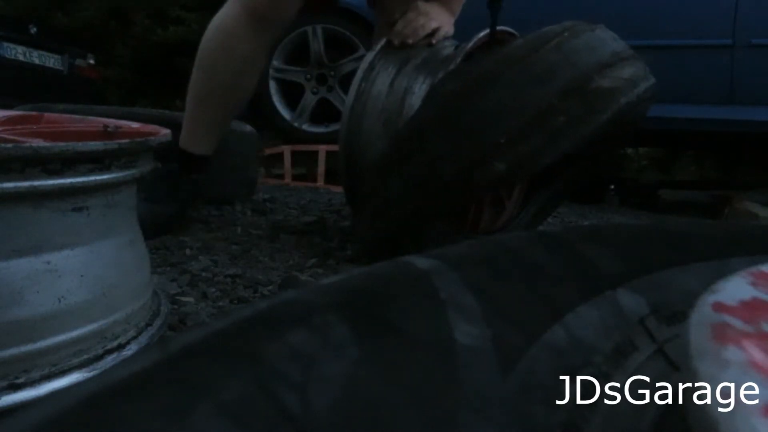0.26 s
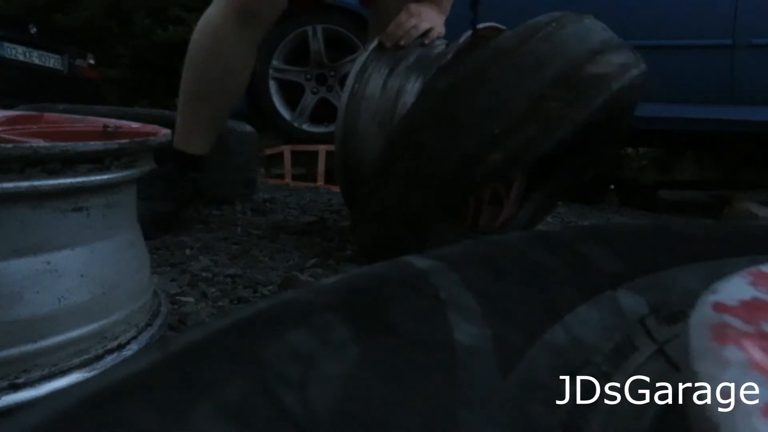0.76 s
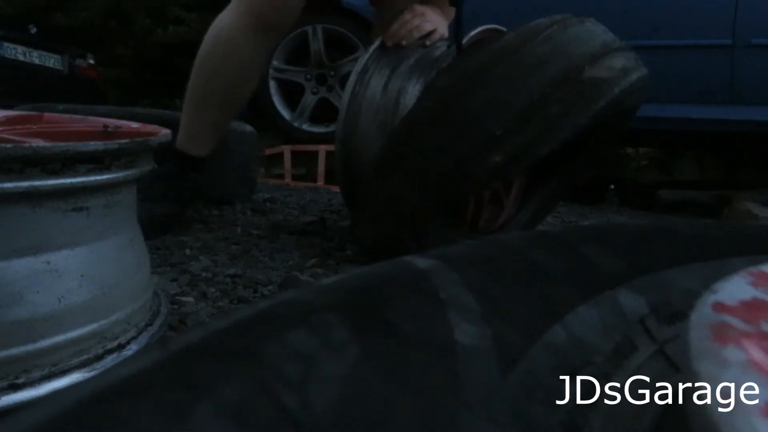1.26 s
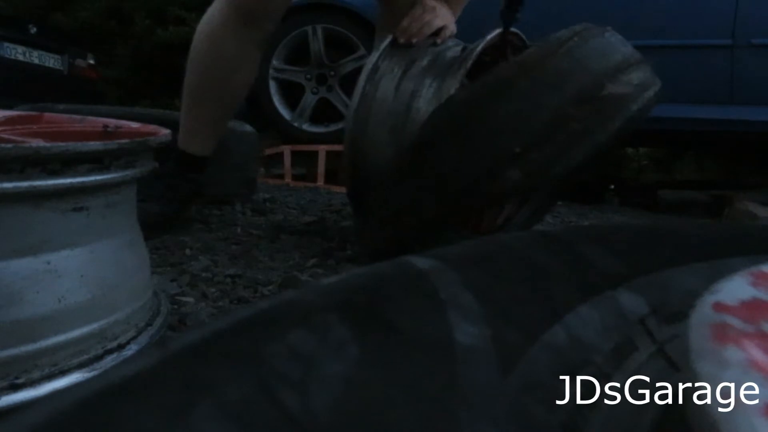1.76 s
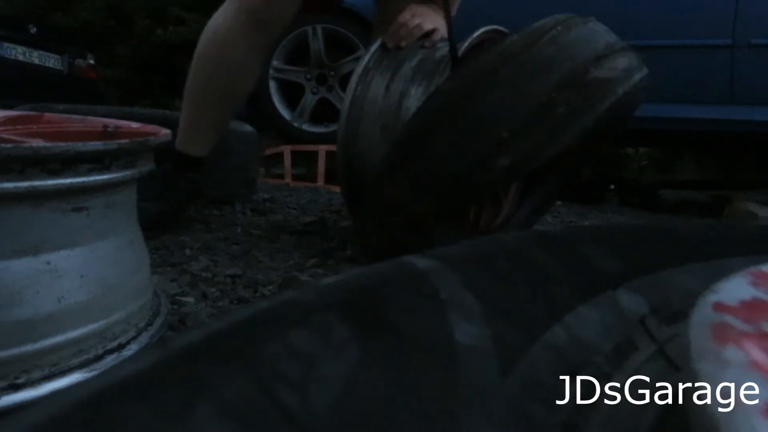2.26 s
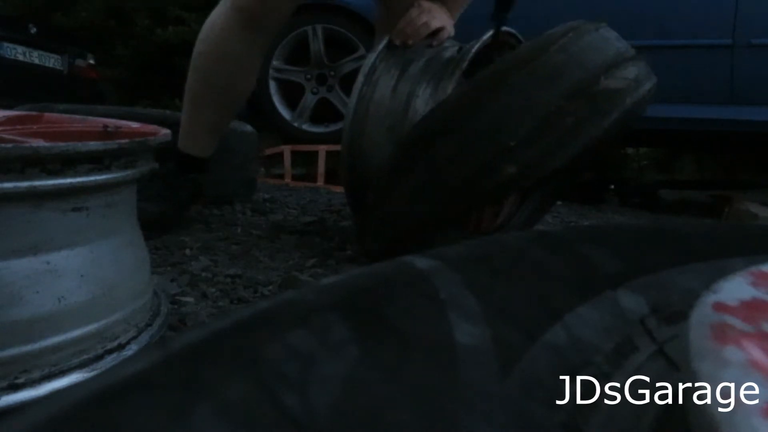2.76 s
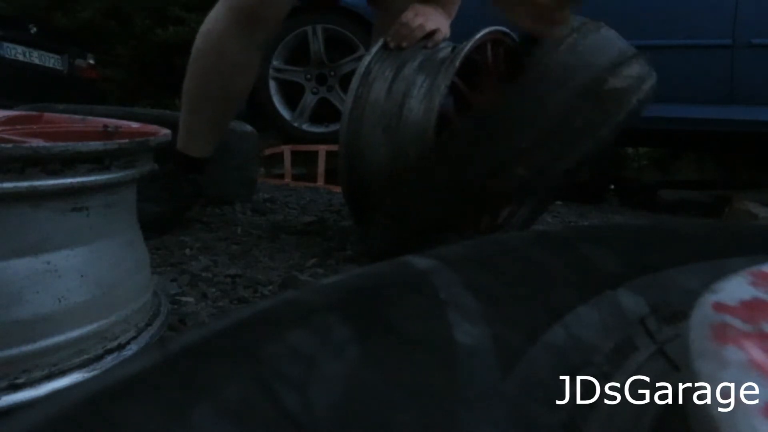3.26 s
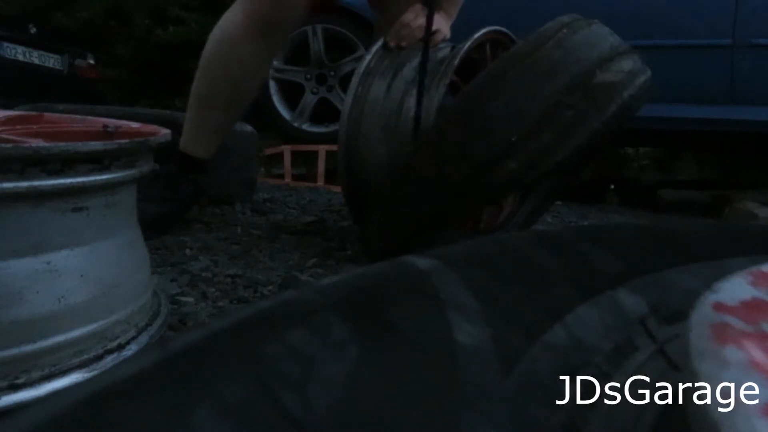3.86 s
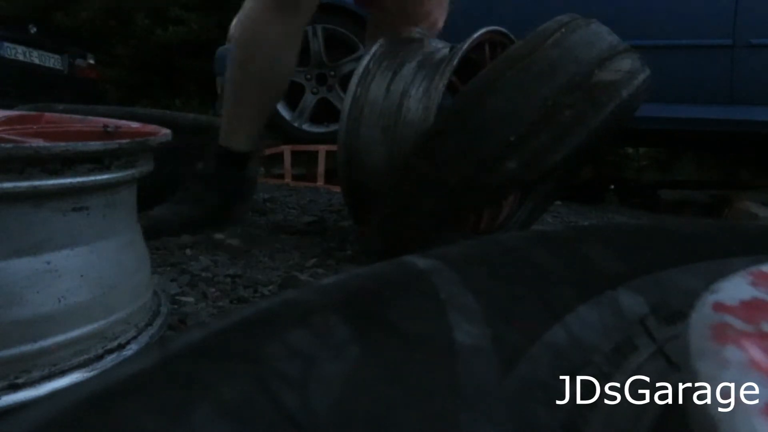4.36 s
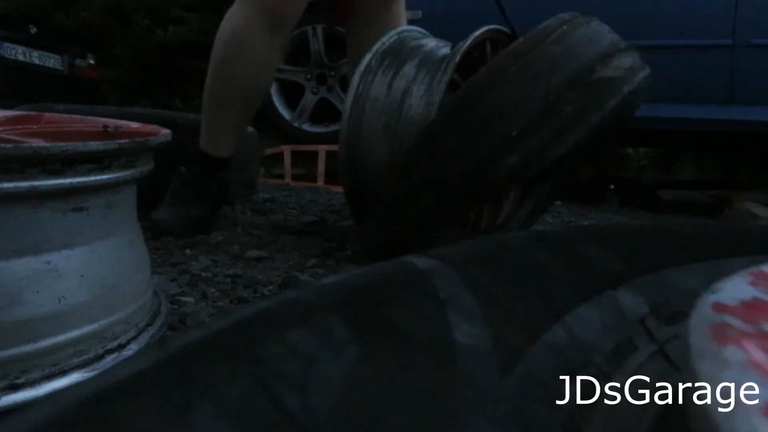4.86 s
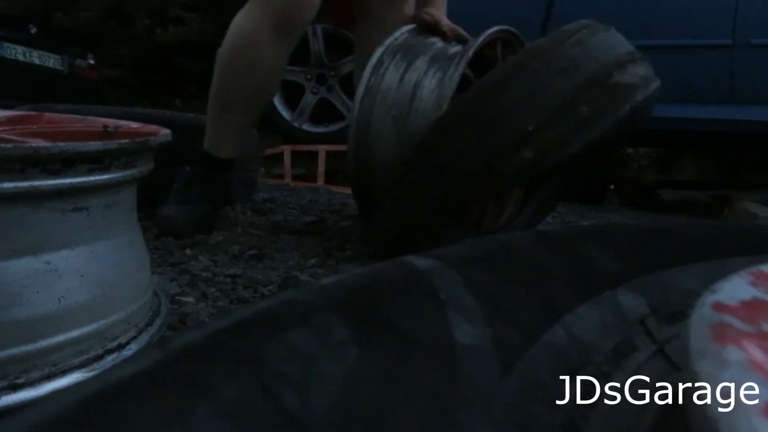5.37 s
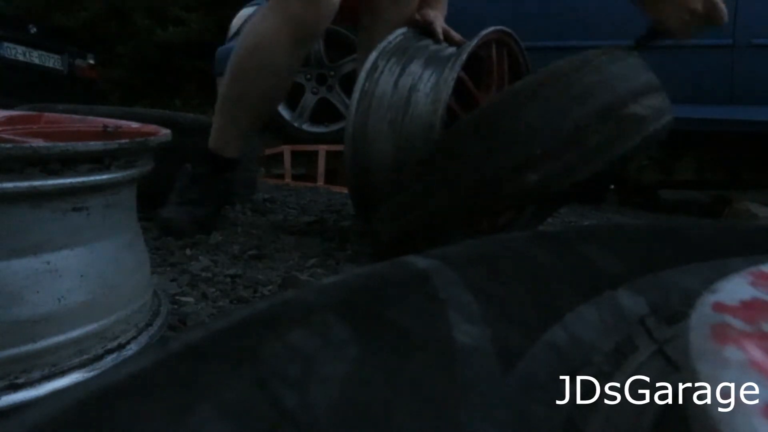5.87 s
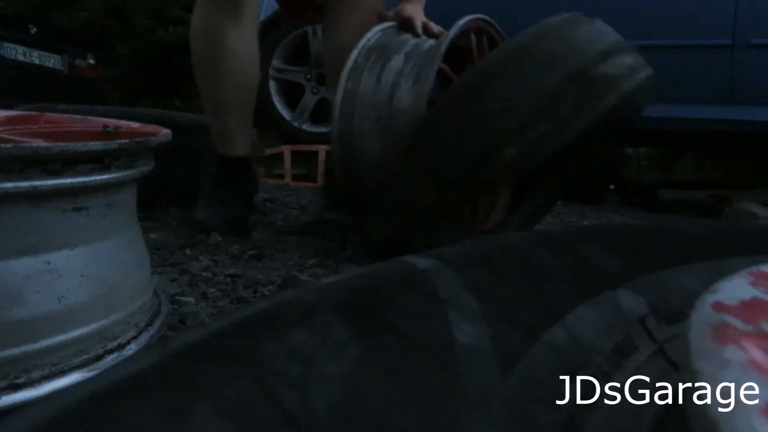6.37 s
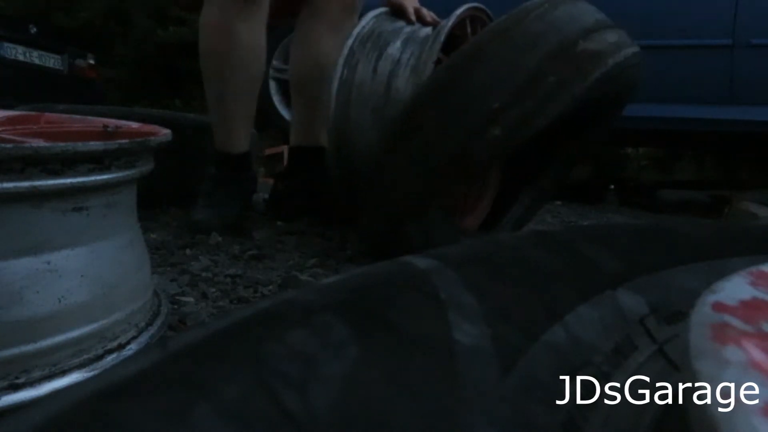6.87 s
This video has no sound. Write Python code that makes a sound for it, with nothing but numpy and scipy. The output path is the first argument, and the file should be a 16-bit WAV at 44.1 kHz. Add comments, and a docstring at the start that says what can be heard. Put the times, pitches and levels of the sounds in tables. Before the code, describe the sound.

Outdoors on gravel, close to a small camera microphone, rubber judders faintly before a hard clank cracks on a metal rim with a hollow tyre thud. Lighter knocks, scrapes and brief squeaks follow, then clusters of strong clanks. Later, stones crunch under feet and wheel, low bumps push through the ground, and small bright knocks continue to the end over soft hiss.

```python
"""Outdoors on gravel in evening air and microphone hiss, a steel bar prises a tyre off an alloy rim.
First the tyre judders in stick-slip; then a blow cracks on the rim, rings its damped modes and thuds
in the hollow. Scrapes and squeaks follow, dense clicks and gliding noise. Later, feet and wheel
crunch stones (clumped clicks), the wheel bumps the ground, and knocks go on to the end.
A small camera's two microphone ports hear it all; its gain drops after loud blows."""
import sys
import numpy as np
from scipy import signal
from scipy.fft import rfft, irfft
from scipy.io import wavfile
from scipy.ndimage import uniform_filter1d

SR = 44100
rng = np.random.default_rng(int(sys.argv[2]) if len(sys.argv) > 2 else 0)


def output_pcm(signal):
    """Save a mono or channel-first signal as 16-bit PCM at the path in sys.argv[1].

    Samples are clipped to [-1, 1] before scaling.
    """
    pcm = np.clip(np.atleast_2d(signal).T, -1, 1) * 32767
    wavfile.write(sys.argv[1], SR, np.round(pcm).astype(np.int16))


N = 313992


def from_db(db):
    """Decibels to gain."""
    return 10 ** (np.asarray(db) / 20)


def rms_one(x):
    """Scale to rms 1."""
    return x / np.sqrt(np.mean(x ** 2) + 1e-20)


def evened(x, span_s):
    """Level held near rms 1 over a span."""
    return x / np.sqrt(uniform_filter1d(x ** 2, int(span_s * SR)) + 1e-9)


def in_time(rows):
    """Columns of a curve, one value per sample."""
    s, *columns = np.transpose(rows)
    t = np.arange(N) / SR
    return [np.interp(t, s, column) for column in columns]


def at_hz(points, hz):
    """Read a spectrum on a log-frequency axis."""
    point_hz, values = np.transpose(points)
    return np.interp(np.log(hz + 1), np.log(point_hz + 1), values)


def colour(x, spectrum):
    """Shape by a spectrum in dB."""
    hz = np.fft.rfftfreq(N, 1 / SR)
    return irfft(rfft(x) * from_db(at_hz(spectrum, hz)), N)


def flicker(span_s):
    """Slow random wander of rms 1."""
    width = int(span_s * SR)
    once = uniform_filter1d(rng.standard_normal(N), width)
    return rms_one(uniform_filter1d(once, width))


def grains(per_s, spread_db):
    """Random clicks of uneven size and sign; rms 1."""
    size_db = spread_db * np.minimum(rng.exponential(1, N), 4)
    sizes = from_db(size_db) * rng.choice([-1, 1], N)
    return rms_one(sizes * (rng.random(N) < per_s / SR))


def add(track, s, sound):
    """Mix a sound into a track at time s."""
    i = round(s * SR)
    track[i:i + len(sound)] += sound[:N - i]


def in_strokes(rows, attack_s, release_s):
    """One gain track per stroke: linear attack, hold to the end of its length, exponential release."""
    t = np.arange(N) / SR
    strokes = []
    for s, length, *_ in rows:
        attack = np.clip((t - s) / attack_s, 0, 1)
        release = np.exp(-np.clip((t - s - length) / release_s, 0, 30))
        strokes.append(attack * release)
    return strokes


def mixed(strokes, levels_db):
    """Strokes at their levels, summed by power."""
    return np.sqrt(sum((from_db(db) * stroke) ** 2 for stroke, db in zip(strokes, levels_db)))


def ring(clicks, hz, t60):
    """A damped resonance: a unit click sets a sine of height 1 ringing."""
    r = from_db(-60 / (t60 * SR))
    w = 2 * np.pi * hz / SR
    return signal.lfilter([0, np.sin(w)], [1, -2 * r * np.cos(w), r * r], clicks + 1e-18)


def struck(modes, t, favoured, damping, scatter_db, treble_db=0):
    """Damped modes after one blow: those near the favoured pitches ring most, treble_db sets the high ones."""
    hz, level_db, t60 = np.transpose(modes)[:, :, None]
    focus_db = sum(db * np.exp(-(np.log(hz / f) / width) ** 2) for f, db, width in favoured)
    chance_db = scatter_db * rng.standard_normal(hz.shape)
    gain = from_db(level_db + focus_db + chance_db + treble_db * (hz > 4500))
    free = from_db(-60 * t / t60)
    # most of the swing is damped by hand and rubber, a little rings on freely
    held = free ** np.clip(damping, .2, 5)
    ringing_on = from_db(-20.5) * free ** (0.6 * np.sqrt(damping))
    waves = gain * np.sin(2 * np.pi * hz * t) * (held + ringing_on)
    signs = rng.choice([-1, 1], hz.shape)
    return (signs * waves).sum(axis=0) / np.sqrt(np.sum(gain ** 2))


# spectrum of the place and the hiss: (frequency [Hz], relative level [dB])
AIR_SPECTRUM = [(12, -16), (40, 0), (126, -11), (221, -5.5), (300, -9.5), (450, -6), (620, -20), (800, -13),
                (2100, -18.5), (2350, -18), (2620, -14), (2950, -21), (3500, -20.5), (8000, -32.5),
                (13000, -39.5), (15800, -51)]
# how alike left and right are: (frequency [Hz], correlation [0 to 1])
AIR_LEFT_RIGHT = [(50, 0.36), (300, 0.56), (1000, 0.84), (4000, 0.39), (12000, 0.23)]
AIR_DB = -50


def air():
    """Evening air and microphone hiss: shaped noise, less alike left and right in the treble."""
    hz = np.fft.rfftfreq(N, 1 / SR)
    alike = np.clip(at_hz(AIR_LEFT_RIGHT, hz), 0, 1)
    mid, side = rfft(rng.standard_normal((2, N))) * from_db(at_hz(AIR_SPECTRUM, hz))
    both = np.sqrt(1 + alike) * mid + np.sqrt(1 - alike) * side * [[1], [-1]]
    return from_db(AIR_DB) * rms_one(irfft(both, N))


def echoes(x):
    """A few dull reflections from car and wall, on paths about 4 to 14 m longer, other ones per side."""
    dull = signal.lfilter([.5], [1, -.5], x)
    lags = (np.array([[.011, .023, .041], [.013, .027, 0.041]]) * SR).astype(int)
    sides = []
    for side in lags:
        # later reflections are weaker, by 250 dB per s
        sides.append(sum(from_db(-250 * lag / SR) * np.pad(dull, (lag, 0))[:N] for lag in side))
    return np.array(sides)


# the wheel bumps the ground: (time [s], level [dB])
GROUND_BUMPS = [(3.041, -21.5), (3.559, -28), (5.443, -22), (5.598, -21.5), (6.121, -47), (6.956, -29)]
BUMP_HZ, BUMP_T60_S = 63.8, 0.14


def bumps():
    """A soft low push through the ground: one decaying sine."""
    out, t = np.zeros(N), np.arange(SR // 4) / SR
    fade = (1 - np.exp(-t / 0.004)) * from_db(-60 * t / BUMP_T60_S)
    push = fade * np.sin(2 * np.pi * BUMP_HZ * t)
    for s, level_db in GROUND_BUMPS:
        add(out, s, from_db(level_db) * push)
    return out


# crunches under feet and wheel: (start [s], length [s], grit level [dB], body level [dB])
CRUNCHES = [(2.565, 0.055, -49, -37.5), (3.001, 0.027, -53, -35.5), (3.07, 0.061, -58, -46),
            (4.216, 0.082, -67, -44), (4.315, 0.064, -47, -42.5), (4.4, 0.024, -55, -62),
            (4.47, 0.074, -48, -35), (4.538, 0.053, -56, -40.5), (5.102, .09, -46.5, -49),
            (5.37, 0.032, -53.5, -47), (5.432, .1, -51, -37), (5.544, 0.066, -43.5, -57),
            (5.64, 0.097, -58, -44), (5.762, 0.045, -53.5, -43), (5.819, 0.028, -51, -45),
            (5.886, 0.024, -58.5, -45), (6.042, 0.067, -47, -36.5), (6.121, 0.069, -52, -39),
            (6.661, 0.058, -61, -43), (6.926, 0.025, -35.5, -31), (6.995, 0.036, -40, -53),
            (7.073, .05, -51, -45)]
# bright grit of the stones: (frequency [Hz], relative level [dB])
GRIT_SPECTRUM = [(1500, -1.5), (3000, -1.5), (6000, -5.5), (11000, -11), (14000, -36), (16000, -43.5)]
# duller body of the stones: (frequency [Hz], relative level [dB])
STONE_SPECTRUM = [(150, 7), (430, 8.5), (1200, -0.5), (2200, -6), (4000, -35.5)]
CRUNCH_ATTACK_S, CRUNCH_RELEASE_S = 0.013, 0.015


def gravel():
    """Clumps of stone clicks: bright grit over a duller body."""
    _, _, grit_db, body_db = np.transpose(CRUNCHES)
    crunches = in_strokes(CRUNCHES, CRUNCH_ATTACK_S, CRUNCH_RELEASE_S)
    clumps = from_db(3 * flicker(.006) + 1.5 * flicker(.02))
    grit = rms_one(colour(grains(4900, 1.9) * clumps, GRIT_SPECTRUM))
    body = rms_one(colour(grains(900, 0.41) * clumps, STONE_SPECTRUM))
    return mixed(crunches, grit_db) * grit + mixed(crunches, body_db) * body


# dull knocks and ticks, some of them the short low body of a bar blow:
# (time [s], level [dB], pitch [Hz])
DULL_TICKS = [(1.312, -26.5, 753), (1.839, -26.5, 775), (1.975, -32, 604), (2.343, -27, 1390),
              (2.394, -20.5, 1347), (4.245, -23, 1410), (4.883, -16.5, 1020), (5.202, 3.5, 1277),
              (6.135, -19.5, 1105), (6.417, -24.5, 1180)]


def ticks():
    """Dull knocks and ticks: a strongly damped sine that rings for a cycle or two."""
    out, t = np.zeros(N), np.arange(SR // 50) / SR
    for s, level_db, pitch_hz in DULL_TICKS:
        cycles = t * pitch_hz
        fade = (1 - np.exp(-cycles / .3)) * np.exp(-cycles / 1.2)
        add(out, s, from_db(level_db) * np.sin(2 * np.pi * cycles) * fade)
    return out


# squeaks and squeals of rubber or of the scraping bar:
# (start [s], length [s], level [dB], first pitch [Hz], last pitch [Hz])
GLIDING_SQUEAKS = [(1.152, .08, -52.5, 1218, 1000), (1.264, 0.028, -40.5, 882, 818),
                   (2.209, .035, -34, 854, 900), (2.241, .07, -33.5, 951, 1450),
                   (2.339, 0.027, -44, 1458, 1470), (2.406, .03, -46.5, 1450, 1480),
                   (6.745, 0.2, -56.5, 2900, 2500)]
SQUEAK_ATTACK_S, SQUEAK_RELEASE_S = 0.0041, 0.0098


def squeak():
    """Squeaks and squeals of rubber or of the scraping bar: rough narrow noise around one gliding pitch."""
    s, length, level_db, first_hz, last_hz = np.transpose(GLIDING_SQUEAKS)
    times = np.ravel([s, s + length], "F")
    pitches = np.ravel([first_hz, last_hz], "F")
    pitch_hz, = in_time(np.column_stack([times, pitches]))
    level = mixed(in_strokes(GLIDING_SQUEAKS, SQUEAK_ATTACK_S, SQUEAK_RELEASE_S), level_db)
    carrier = np.exp(2j * np.pi * np.cumsum(pitch_hz) / SR)
    rough = uniform_filter1d(rng.standard_normal((2, N)), int(.004 * SR))
    tone = rms_one(np.real(carrier * (rough[0] + 1j * rough[1])))
    return level * from_db(3.6 * flicker(.008)) * tone


# rubber juddering along the rim: (time [s], level [dB])
JUDDER_LEVEL = [(0, -51), (0.27, -54), (0.52, -37.5), (0.66, -50.5), (1.13, -56.5), (1.28, -61.5),
                (1.85, -37), (2.2, -40), (2.32, -49.5), (2.85, -49), (2.94, -43.5), (3.68, -50.5),
                (3.99, -73.5), (4.3, -55), (4.58, -45.5), (4.82, -50), (5.14, -52.5), (5.3, -37.5),
                (5.43, -36), (5.45, -26), (5.6, -28.5), (5.66, -43.5), (5.87, -41.5), (6.12, -65),
                (6.5, -41), (6.96, -55.5), (7.12, -40)]
# modes of tyre hollow and side walls, for judder and thuds:
# (frequency [Hz], relative level [dB], t60 before extra damping [s])
TYRE_MODES = [(157, -9.5, 0.082), (194, -2, 0.087), (236.8, -2, 0.11), (294.6, -10.5, 0.1), (379, 0, 0.064),
              (444, -2, 0.071), (509, -4, 0.099), (714, -16, 0.07)]


def judder():
    """Stick-slip of the bead in uneven clumps of clicks, into the tyre's modes."""
    clicks = grains(260, 2.5) * from_db(2.2 * flicker(.012))
    body = 0
    for k, (hz, mode_db, t60) in enumerate(TYRE_MODES):
        body = body + from_db(mode_db) * ring(clicks, hz, t60) * (-1) ** k
    level_db, = in_time(JUDDER_LEVEL)
    return from_db(level_db) * evened(rms_one(body), 0.0557)


# thuds in the tyre, from blows and from rubber jerking free: (time [s], level [dB], favoured pitch [Hz])
TYRE_THUDS = [(0.56, -1, 227), (0.993, -27.5, 404), (1.309, -21, 194), (1.357, -17, 197),
              (1.668, -31.5, 461), (1.723, -25, 213), (1.764, -23.5, 238), (1.879, -18, 217),
              (2.195, -17.5, 466), (2.34, -27.5, 452.5), (2.395, -24.5, 181), (2.531, -10, 175),
              (2.626, -15, 194), (2.774, -28.5, 218), (2.908, -32, 215), (3.058, -12, 193),
              (3.111, -18.5, 200), (3.306, -28.5, 478), (3.541, -11, 463), (3.841, -21.5, 573),
              (4.229, -29.5, 230.5), (4.499, -25.5, 457), (4.604, -21, 455), (4.641, -20.5, 420),
              (5.127, -13.5, 422), (5.201, -4.5, 267), (5.447, -18, 260), (5.707, -21.5, 510),
              (5.758, -32, 498), (6.318, -23, 367), (6.67, -29, 411), (6.926, -21, 300),
              (6.978, -26, 151.5), (7.012, -22.5, 210)]


def jerks():
    """Blows and single slips of the bead set the hollow ringing."""
    out, t = np.zeros(N), np.arange(SR // 5) / SR
    rise = 1 - np.exp(-t / 0.0026)
    for s, level_db, pitch_hz in TYRE_THUDS:
        modes = struck(TYRE_MODES, t, [(pitch_hz, 12., .12)], 0.94, scatter_db=3.0)
        add(out, s, from_db(level_db) * rise * modes)
    return out


# strokes of the bar along the rim: (start [s], length [s], level [dB], best excited pitch [Hz])
BAR_STROKES = [(0.675, 0.073, -48, 1720), (0.863, 0.16, -49.5, 1760), (1.132, 0.066, -49, 1210),
               (1.214, 0.075, -46, 2270), (1.814, 0.32, -54, 1280), (2.145, 0.038, -47, 1450),
               (2.221, 0.053, -31.5, 1110), (2.496, 0.059, -33.5, 1140), (2.569, .08, -38.5, 1710),
               (2.708, 0.2, -52, 2280), (2.947, 0.13, -45.5, 2330), (3.022, 0.073, -33.5, 2400),
               (3.185, 0.15, -44, 1590), (3.347, 0.22, -51, 1870), (3.629, 0.066, -33.5, 2344),
               (4.661, 0.086, -29.5, 2090), (4.817, 0.028, -41, 3255), (4.855, .03, -45, 1760),
               (4.92, 0.068, -48.5, 1790), (5.062, 0.066, -30.5, 1964), (5.105, 0.064, -26, 1987),
               (5.232, .05, -42, 1830), (5.355, 0.12, -44.5, 1950), (5.45, 0.089, -40, 2000),
               (5.537, 0.084, -37, 1920), (5.692, 0.029, -46.5, 1980), (6.35, 0.058, -46.5, 1285),
               (6.407, 0.014, -43, 2000), (6.48, 0.16, -58.5, 1600)]
# rim and bar modes, for scrapes and blows:
# (frequency [Hz], relative level [dB], t60 before extra damping [s])
RIM_MODES = [(785, -8, .08), (965, -10, .08), (1222, -12, .17), (1328, -8, .11), (1570, -14, .1),
             (1685, -7, .12), (1835, -9, .08), (1945, -11, .07), (2070, -7, .15), (2283, -20, .1),
             (2530, -8, .12), (2620, -10, .09), (2690, -12, .11), (2830, -16, .08), (3160, -15, .1),
             (3305, -9, .14), (3680, -7, .1), (4015, -12, .16), (4315, -15, .08), (4715, -19, .13),
             (5000, -13, .1), (5250, -21, .13), (5620, -22, .1), (6000, -18, .11), (6390, -26, .1),
             (6750, -26, .1), (7200, -28, .1), (7800, -24, .06), (8750, -34, .06)]
# bare contact of steel on rim, for scrapes and blows: (frequency [Hz], relative level [dB])
CONTACT_SPECTRUM = [(200, -12), (500, -3), (1450, -3.5), (3000, 1.5), (5000, -6.5), (8000, -15),
                    (12000, -24.5), (16000, -45.5)]
SCRAPE_ATTACK_S, SCRAPE_RELEASE_S = 0.024, 0.02


def scrape():
    """Dense clicks into the rim; the contact point decides which modes answer."""
    s, _, level_db, pitch_hz = np.transpose(BAR_STROKES)
    level = mixed(in_strokes(BAR_STROKES, SCRAPE_ATTACK_S, SCRAPE_RELEASE_S), level_db)
    latest = np.maximum(np.searchsorted(s, np.arange(N) / SR) - 1, 0)
    favoured_hz = pitch_hz[latest]
    clicks = grains(1800, 3.), grains(1800, 3.)
    body = 0
    for k, (hz, mode_db, t60) in enumerate(RIM_MODES):
        near = np.exp(-(np.log(hz / favoured_hz) / 0.16) ** 2)
        grip = from_db(4 * flicker(.04))
        push = clicks[k % 2] * grip * from_db(1.33 * mode_db + 8.4 * near)
        body = body + ring(push, hz, t60 / 3.76)    # shorter than the free ring
    rasp = rms_one(colour(clicks[0], CONTACT_SPECTRUM))
    body = rms_one(body) + from_db(-11) * rasp
    return level * from_db(2.26 * flicker(0.016)) * evened(body, 0.041)


# bar on rim: (time [s], strength [dB], ring against strength [dB], treble against strength [dB],
# best excited high pitch [Hz], its emphasis [dB], low pitch [Hz], damping [factor])
BAR_BLOWS = [(0.558, 6.5, -5.5, -8, 1660, 10, 1205, 2.53), (0.887, -32, -6, -30, 1630, 11, 950, 0.76),
             (0.953, -30.5, -8.5, -25, 2300, 26.5, 1370, 1.1), (0.996, -15, -6.5, -20, 2120, 14, 800, 2),
             (1.313, -15, 3, -28, 2020, 14, 840, 2.5), (1.354, -14, -2.5, -18, 1630, 22, 1310, 1.5),
             (2.199, -2, -5.5, -13, 2230, 12.5, 934, 1.68), (2.532, -16, 8, -38, 2006, 11, 1380, 3.4),
             (2.621, -18.5, -1, -13, 1605, 25, 1230, 1.75), (3.346, -28, -6.5, -8.5, 3750, 9, 1120, 1.8),
             (3.39, -29, -9.5, -15, 1680, 6, 783, 1.1), (3.497, -28, -8.5, -14, 1840, 14, 1400, 0.39),
             (3.543, -1, -6, -9.5, 2690, 15, 907, 1), (3.575, 0, -12, -14, 1930, 10, 1460, 1.18),
             (3.604, -11, -1, -20, 1965, 22, 960, 1.2), (3.624, -17, -9, -22, 2000, 2, 1330, 1.7),
             (3.841, 1.5, -3, -7, 4970, 10.5, 2710, 1.74), (4.604, 1.5, -5.5, -17, 2110, 22.5, 1387, 0.83),
             (4.642, -14.5, 5.5, -32, 2150, 22.5, 1150, 1.6),
             (5.132, -17.5, 2, -9.5, 2013, 14.5, 791, 0.51), (5.202, -10.5, 4.5, -10, 1893, 26, 1280, 1.15),
             (5.408, -34.5, 2, -11, 2740, 12, 724, 1.4), (5.489, -42, 3, -4, 3560, 18, 1310, 0.91),
             (5.713, -44.5, 10, -6, 2030, 23, 721, 1.9), (5.752, -47, 4, -1, 3720, 13, 1950, 0.82),
             (5.836, -43, 2.5, -15, 2700, 7, 1330, 1.5), (6.319, -10, -2, -15.5, 2480, 12, 1140, 1.66),
             (6.343, -30, -11, -5.5, 2490, 18, 1222, 1.3), (6.931, -18.5, -10.5, -9.5, 3080, 21, 946, 0.64),
             (6.972, -25.5, -0.5, -9, 3180, 19, 1130, 2.1), (7.005, -20, -4.5, -6, 4270, 27, 1140, 1.9),
             (7.019, -22, -11, 0.5, 4280, 33, 926, 0.86), (7.099, -18, -2.5, -9, 3100, 20, 966, 2.9)]
CRACK_DB, LOW_LIFT_DB = -6.5, 9   # crack against strength; emphasis of the low pitch
# contact decay; rattle decays at damping 1; rattle against contact
CONTACT_S, SCATTER_S, TREBLE_SCATTER_S, SCATTER_DB = 0.0037, 0.034, 0.026, -16
DAMPING_SLOPE = 0.24   # higher modes are damped more: power of pitch


def blows():
    """Each knock: a noisy crack and the rim's modes."""
    cracks, treble, rings = np.zeros((3, N))
    t = np.arange(SR // 3) / SR
    onset = 1 - np.exp(-t / 0.00046)
    rise = 1 - np.exp(-t / 0.00091)      # the rim takes a moment to swing up
    by_pitch = (np.array(RIM_MODES)[:, :1] / 2000) ** DAMPING_SLOPE

    def crack_fade(damping, tail_s):
        """A sharp contact, then a rattle that a firm grip shortens."""
        rattle = from_db(SCATTER_DB) * np.exp(-t * np.sqrt(damping) / tail_s)
        return onset * (np.exp(-t / CONTACT_S) + rattle)

    for s, strength_db, ring_db, treble_db, high_hz, high_db, low_hz, damping in BAR_BLOWS:
        # the rattle loses its treble first
        add(cracks, s, from_db(strength_db + CRACK_DB) * crack_fade(damping, SCATTER_S))
        add(treble, s, from_db(strength_db + treble_db) * crack_fade(damping, TREBLE_SCATTER_S))
        favoured = (high_hz, high_db, .075), (low_hz, LOW_LIFT_DB, .08)
        modes = struck(RIM_MODES, t, favoured, damping * by_pitch, scatter_db=4.0, treble_db=treble_db + 13)
        add(rings, s, from_db(strength_db + ring_db) * rise * modes)
    noise = rms_one(colour(rng.standard_normal(N), CONTACT_SPECTRUM))
    low = signal.sosfilt(signal.butter(2, 4500, fs=SR, output="sos"), noise)
    return cracks * low + treble * rms_one(noise - low) + rings


def scene():
    """Wheel and gravel in the middle, air behind."""
    ground = bumps() + gravel()
    tyre = judder() + jerks()
    bar = scrape() + blows()
    middle = ground + ticks() + squeak() + tyre + bar
    return air() + from_db(-20) * echoes(middle) + middle


# what differs between the two microphone ports: (frequency [Hz], side minus mid [dB])
PORT_DIFFERENCE = [(50, -30.5), (150, -19), (330, -6), (600, -20), (2000, -27), (4000, -15.5), (8000, -9.5),
                   (13000, -10)]
CUTOFF_HZ = 15900


def record(dry):
    """Two microphone ports that differ by pitch, bass cut, slow-release gain control, overload, treble cut."""
    hz = np.fft.rfftfreq(N, 1 / SR)
    # the part that differs between the ports turns in phase ever faster towards the treble
    turn = np.exp(-.5j * np.pi + 1j * (hz / 1500) ** 2)
    differs = from_db(at_hz(PORT_DIFFERENCE, hz)) * turn
    ports = irfft(rfft(dry) * (1 + differs * [[1], [-1]]), N)
    ports = signal.sosfilt(signal.butter(2, 60, "high", fs=SR, output="sos"), ports)
    level_db = 10 * np.log10(uniform_filter1d(np.mean(ports ** 2, axis=0), size=441) + 1e-12)
    fall_db = 11.6 * np.arange(N) / SR     # the held peak level falls by 11.6 dB per s
    peak_db = np.maximum.accumulate(level_db + fall_db) - fall_db
    over_db = np.maximum(peak_db + 20.5, 0)
    smooth_over_db = signal.lfilter([.0004], [1, .0004 - 1], over_db)
    held = np.clip(ports * from_db(-.4 * smooth_over_db), -.97, .97)
    return signal.sosfilt(signal.cheby2(12, 60, CUTOFF_HZ, fs=SR, output="sos"), held)


dry = scene()
out = record(dry)
output_pcm(out)
```